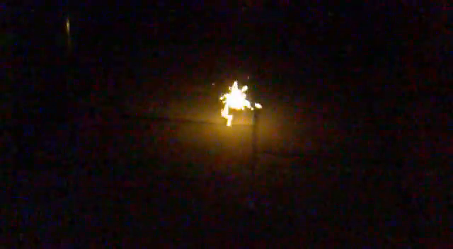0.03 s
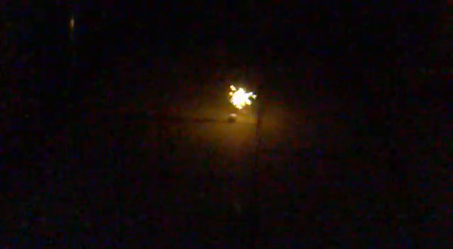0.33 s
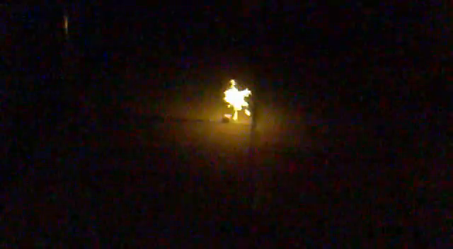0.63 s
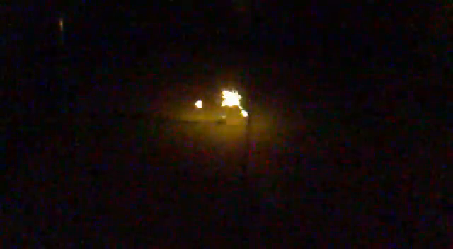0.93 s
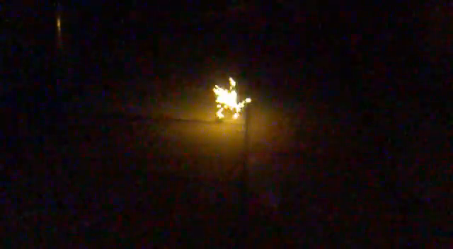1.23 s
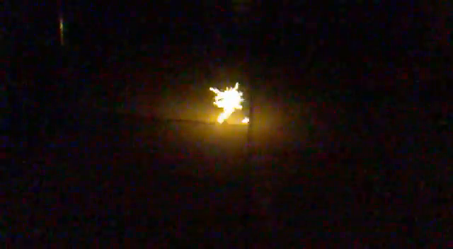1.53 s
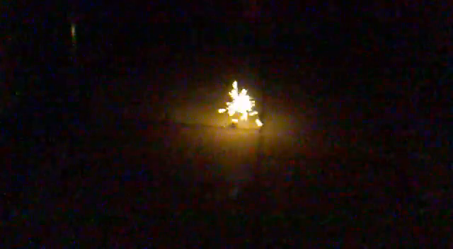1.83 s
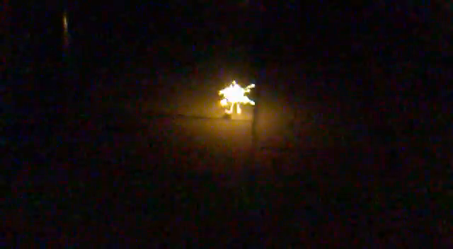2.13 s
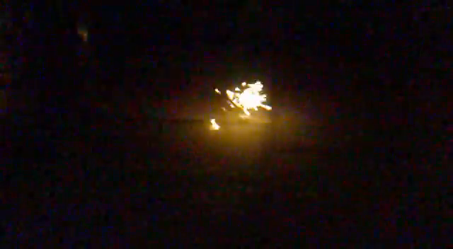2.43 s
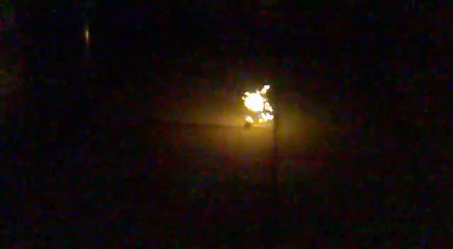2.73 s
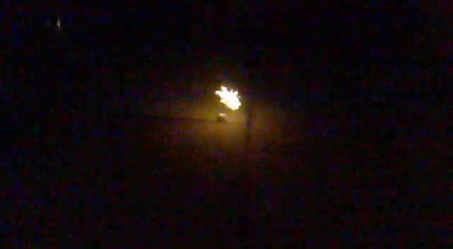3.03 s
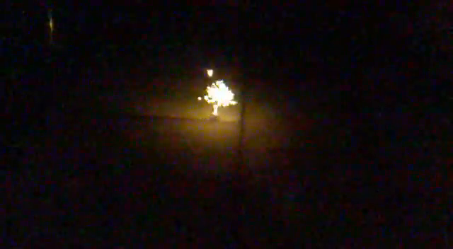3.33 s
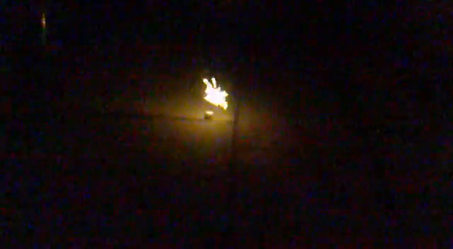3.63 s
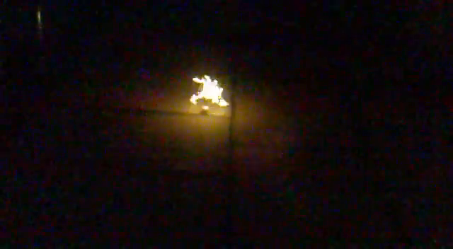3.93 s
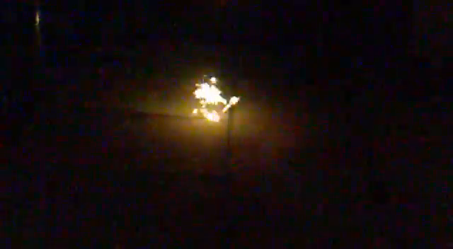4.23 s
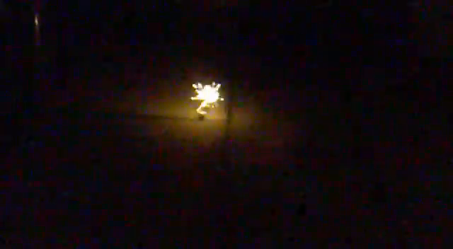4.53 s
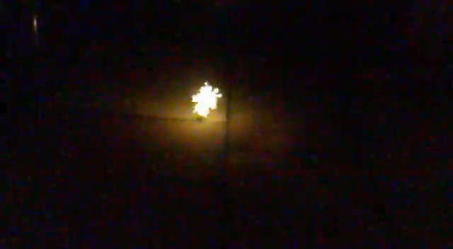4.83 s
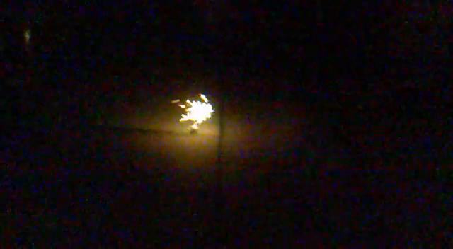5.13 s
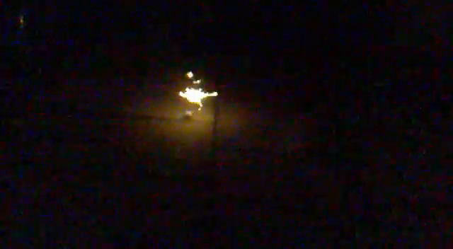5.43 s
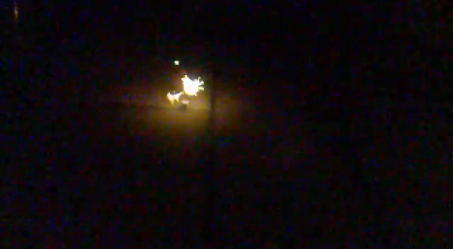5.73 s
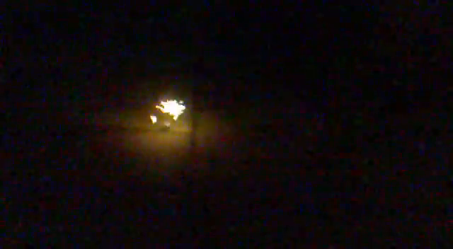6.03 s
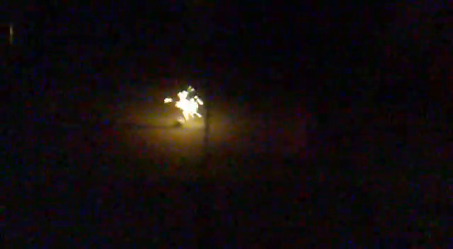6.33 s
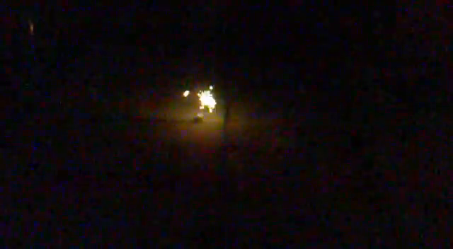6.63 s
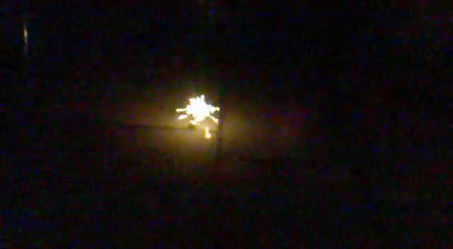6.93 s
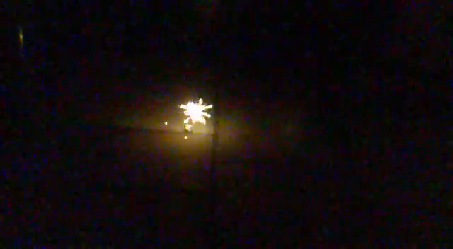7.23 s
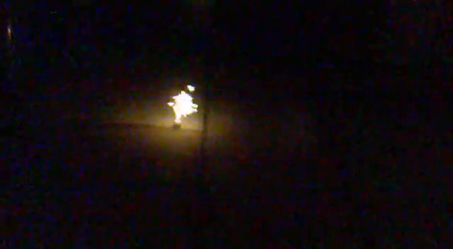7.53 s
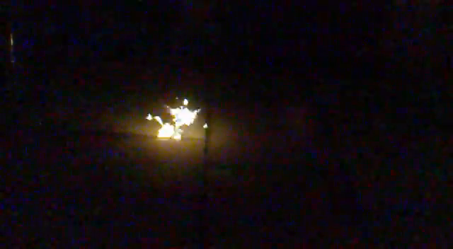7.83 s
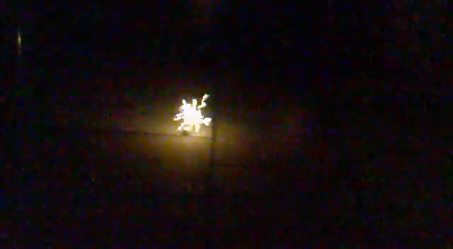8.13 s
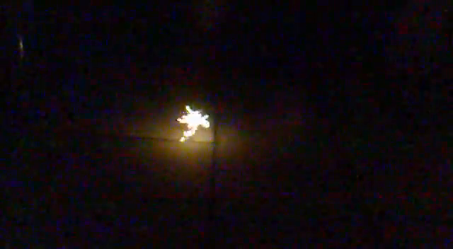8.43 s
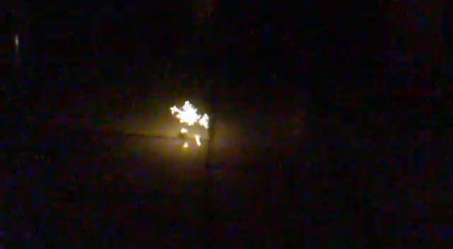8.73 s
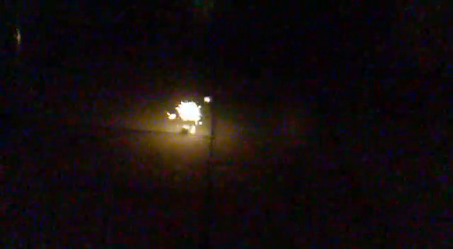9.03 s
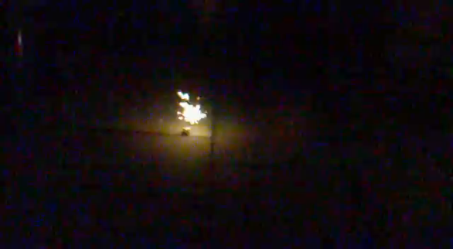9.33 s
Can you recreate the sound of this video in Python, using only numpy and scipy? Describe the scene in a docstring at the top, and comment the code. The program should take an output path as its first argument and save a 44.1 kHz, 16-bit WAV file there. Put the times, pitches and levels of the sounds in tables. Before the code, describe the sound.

A faint night-time town rumble and light microphone hiss continue throughout, outdoors. During the first six seconds a very distant, barely audible engine climbs through its gears. At about 2.6 seconds something small and hard snaps close by in a quick, quiet cluster of gritty clicks, followed by two soft taps at 2.8 seconds. At 5.1 seconds a small firework gives a sharp, dry bang with a lighter knock right behind it, then a duller pop at 5.5 seconds. Each leaves a brief wash of noise and an echo from distant walls. A tiny tap comes at 7.1 seconds. At 7.7 seconds the firework gives a loud, bright crack with the strongest echo, dying away within about a second. Then only the background remains, its low rumble swelling slightly around 9 seconds.

```python
"""First comes the faint night rumble of a town, with microphone hiss and a far engine pulling up
through its gears. Something small snaps close by, its clicks exciting the resonances of a hard body,
and two soft taps follow. Then a few dry firework pops go off, each a millisecond pressure pulse.
After each pop a brief broad wash of noise holds, then drops away, and distant walls reflect the
pulse after the round trip of the sound."""
import sys
import numpy as np
from scipy import signal
from scipy.fft import rfft, irfft, next_fast_len
from scipy.io import wavfile
from scipy.ndimage import uniform_filter1d

SR = 44100
rng = np.random.default_rng(int(sys.argv[2]) if len(sys.argv) > 2 else 0)


def file_out(sig):
    """Save sig as 16-bit WAV at sys.argv[1]."""
    # one column per channel
    cols = np.atleast_2d(sig).T
    # limit, then scale
    lim = np.clip(cols, -1, 1)
    pcm = np.round(lim * 32767).astype(np.int16)
    wavfile.write(sys.argv[1], SR, pcm)


N = 417627
TIME = np.arange(N) / SR
FFT_SIZE = next_fast_len(N + 2 * SR)
FREQ = np.maximum(np.fft.rfftfreq(FFT_SIZE, 1 / SR), 1)


# pressure spectrum of each kind of pulse: (frequency [Hz], relative level [dB])
PULSE_SPECTRA = { "crack": [(40, 0), (150, 0), (700, -3), (1100, -5.5), (1450, -4), (1900, 10.5),
                 (2800, 15), (3450, -3), (4350, 15.5), (5500, 11), (6800, -4.5), (7800, 4), (9600, -4.5),
                 (14500, 1)], "bang": [(35, -8), (130, 2.5), (500, 6.5), (700, -6), (1050, 5), (1220, -4),
                 (1850, 10), (2700, 3), (4400, 3.5), (5200, -10.5), (8000, -10), (11000, -25),
                 (15000, -21)], "thud": [(35, -6), (100, 0), (170, -2.5), (500, 4.5), (730, -7), (950, -2),
                 (1800, -6), (2700, -11.5), (3500, -38), (15000, -54)], "knock": [(40, -14), (450, 1.5),
                 (800, -5), (1700, 4), (2300, -1), (3600, -10), (5000, -31), (15000, -43)],
                 "tap": [(40, -12), (500, 2), (1000, -9), (1720, 10), (2200, -7), (15000, -40)], }
# two soft taps following the snap, then the firework pops:
# (time [s], direct gain [dB], wash gain [dB], wall gain [dB], treble of wash and echo [dB], kind)
PULSE_EVENTS = [ (2.7917, -33, -52, -52, -6, "tap"), (2.8262, -31.5, -52, -54, -6, "tap"),
                (5.1492, 0.1, -21.5, -31, 0.5, "bang"), (5.192, -14, -49, -57, -4, "knock"),
                (5.2014, -21, -60, -60, -6, "thud"), (5.4993, -2, -27.5, -37, -4, "thud"),
                (7.1160, -36, -55, -55, -2, "tap"), (7.7308, 1.6, -19, -20.5, -0.5, "crack"), ]

def taps_and_pops(shelf_from_hz=2792, shelf_to_hz=5500):
    """Impulsive radiation: each tap or pop is one pulse. Returns direct, wash and wall shares."""
    direct, wash, wall = np.zeros((3, N))
    for start, db, wash_db, wall_db, treble_db, kind in PULSE_EVENTS:
        add(direct, start, undb(db) * pulse(PULSE_SPECTRA[kind]))
        shelved_pulse = pulse([(shelf_from_hz, 0), (shelf_to_hz, treble_db)])
        add(wash, start, undb(wash_db) * shelved_pulse)
        add(wall, start, undb(wall_db) * shelved_pulse)
    return direct, wash, wall


# clicks: (time [s], relative level [dB], scrape decay by 60 dB [s], knock re click [dB])
SNAP_CLICKS = [(2.6018, -21.5, 0.012, -25), (2.6629, -3.5, 0.0052, -6), (2.6717, -2, 0.014, -15),
               (2.6731, -3, 0.0045, -6), (2.6857, -4, 0.0034, 5.5), (2.7092, -17.5, 0.0089, -3)]
# ringing modes of the hard object: (frequency [Hz], bandwidth [Hz], relative gain [dB])
RING_MODES = [(1650, 300, -2), (2280, 220, 3), (3050, 340, 5), (4090, 480, 4), (5300, 240, 7.5),
              (7000, 300, 3.5), (7700, 330, 2), (8600, 330, -1), (9400, 220, -1.5)]
# modes of its hollow body: (frequency [Hz], bandwidth [Hz], gain [dB])
BODY_MODES = [(85, 9.3, -15), (330, 150, -33), (1075, 270, -21.5)]

def snap(ring_db=-32, tick_db=-51, trail_db=-19, trail_t60=0.15, wash_db=-51, wall_db=-52):
    """Modal excitation: gritty clicks ring a small hard body. Returns direct, wash and wall shares."""
    grit, knock = np.zeros((2, N))
    t = TIME[:SR]
    for start, db, t60, knock_db in SNAP_CLICKS:
        scrape = fade(t, t60) + undb(trail_db) * fade(t, trail_t60)
        blow = fade(t, t60=0.0061) + undb(-22.5) * fade(t, t60=0.18)
        add(grit, start, undb(db) * scrape * rng.standard_normal(len(t)))
        add(knock, start, undb(db + knock_db) * blow * rng.standard_normal(len(t)))
    bright = filtered(grit, undb(ring_db) * modal_response(RING_MODES) + undb(tick_db))
    hollow = filtered(knock, modal_response(BODY_MODES))
    return bright + hollow, undb(wash_db) * grit, undb(wall_db) * grit


# spectrum of the wash of noise after each sharp sound: (frequency [Hz], gain [dB])
WASH_SPECTRUM = [(40, 9.5), (130, 12.5), (400, 10), (1500, 6.5), (4000, 3.5), (7000, -1.5), (15000, -4)]

def noise_wash(sound, hold_t60=1.8, onset_t60=0.056, onset_db=4, drop_s=0.26):
    """Convolution with noise: a brief broad wash follows each sharp sound, holds, then drops away."""
    hold = 1 / (1 + (TIME / drop_s) ** 6)
    envelope = hold * fade(TIME, hold_t60) + undb(onset_db) * fade(TIME, onset_t60)
    return filtered(sound, noise_tail(envelope) * contour(WASH_SPECTRUM))


# reflecting walls: (distance [m], relative level [dB])
DISTANT_WALLS = [(14, 0), (22.3, 0), (36, -8), (49, -8)]
# spectrum of their echoes: (frequency [Hz], gain [dB])
WALL_SPECTRUM = [(40, 8), (130, 9.5), (500, 7.5), (850, 4.5), (1400, 9.5), (1800, 2), (2400, 3.5),
                 (4000, -7.5), (8000, -9.5), (15000, -16)]

def wall_echoes(sound, rise_s=0.018, slap_t60=0.17, linger_db=-2, linger_t60=1.1, speed_m_per_s=343):
    """Reflection: each wall slaps back after the round trip, then lingers; the energies add."""
    energy = np.zeros(N)
    for metres, db in DISTANT_WALLS:
        t = np.maximum(TIME - 2 * metres / speed_m_per_s, 0)
        rise = np.minimum(t / rise_s, 1)
        decay = fade(t, slap_t60) + undb(linger_db) * fade(t, linger_t60)
        energy += (undb(db) * rise * decay) ** 2
    return filtered(sound, noise_tail(np.sqrt(energy)) * contour(WALL_SPECTRUM))


def noise_tail(envelope, patchy_db=1.3, ring_hz=1370, ring_width_hz=110, ring_db=-9):
    """Random impulse response: the spectrum of an uneven noise tail, ringing a little at one pitch."""
    tail = rng.standard_normal(N) * undb(patchy_db * wander(90)) * envelope
    colour = 1 + undb(ring_db) * resonance(ring_hz, ring_width_hz)
    return rfft(tail / np.linalg.norm(tail), FFT_SIZE) * colour


# one pull per gear: (time [s], duration [s], initial firing rate [Hz], climb [Hz/s], base level [dB])
GEAR_PULLS = [(-0.3, 1.6, 85.5, 1.13, -78.5), (1.504, 0.73, 106, 19, -81), (3.902, 1.88, 96.4, 17.5, -83.5)]

def far_engine(flutter_depth=0.25, drift_depth=0.0039, half_order_db=-11, throttle_s=0.3,
               rev_db_per_hz=0.31):
    """Periodic firing: only the rising note and its half order carry this far, wavering on the way."""
    out = np.zeros(N)
    drift, flutter = wander(14), wander(7.1)
    for start, length, start_hz, climb, db in GEAR_PULLS:
        t = np.clip(TIME - start, 0, length)
        firing_hz = start_hz + climb * t
        phase = 2 * np.pi * np.cumsum(firing_hz * (1 + drift_depth * drift)) / SR
        throttle = np.minimum(np.minimum(t, length - t) / throttle_s, 1)
        gain = throttle * undb(db + rev_db_per_hz * (firing_hz - start_hz))
        out += gain * (np.sin(phase) + undb(half_order_db) * np.sin(phase / 2))
    return np.sqrt(2) * out * (1 + flutter_depth * flutter)


# noise floor of the town: (frequency [Hz], base spectral density [dB re 1/Hz])
TOWN_SPECTRUM = [(12, -110), (30, -104), (53, -92), (88, -98), (135, -103.5), (190, -103.3), (360, -107.5),
                 (560, -107), (900, -108), (1450, -108.3), (1750, -111.5), (2200, -110.7), (5000, -118),
                 (15000, -135)]
# humps on that floor: (frequency [Hz], bandwidth [Hz], base spectral density [dB re 1/Hz])
TOWN_HUMPS = [(540.6, 20, -106), (1317, 70, -103.5), (1500, 47, -108), (2190, 250, -112),
              (3520, 290, -111.5), (5065, 850, -118), (8740, 820, -121)]
# swells of the murmur above the rumble: (peak time [s], half-length [s], rise [dB])
MURMUR_SWELLS = [(0.12, 0.3, 2.2), (1.72, 0.26, 3), (2.75, 0.6, 2.6), (3.95, 0.89, 1.7), (6.3, 0.64, 1),
                 (7.18, 0.2, 3)]
# heaves of the rumble: (peak time [s], half-length [s], rise [dB])
RUMBLE_HEAVES = [(8.98, 0.35, 4), (9.35, 0.3, 2.5)]

def town(murmur_db=-0.23, wander_db=0.44, flicker_db=0.42, split_hz=150,
         rumble_db=2.5, sink_db_per_s=0.07, rumble_flicker_db=1.0):
    """Modulated broadband noise: a murmur swells over a rumble that slowly sinks, then heaves."""
    floor = contour(TOWN_SPECTRUM)
    low_share = 1 / (1 + (FREQ / split_hz) ** 4)
    hump_power = sum(abs(undb(db) * resonance(hz, width)) ** 2 for hz, width, db in TOWN_HUMPS)
    murmur = noise(np.sqrt(floor ** 2 * (1 - low_share) + hump_power))
    rumble = noise(floor * np.sqrt(low_share))
    murmur *= undb(murmur_db + swelling(MURMUR_SWELLS) + wander_db * wander(5) + flicker_db * wander(22))
    trend_db = rumble_db - sink_db_per_s * TIME + swelling(RUMBLE_HEAVES)
    rumble *= undb(trend_db + rumble_flicker_db * wander(5.8))
    return murmur + rumble


def swelling(swells):
    """Slow amplitude modulation: a sum of bell-shaped rises, in dB."""
    return sum(db * np.cos(np.pi / 2 * np.clip((TIME - peak) / half_length, -1, 1)) ** 4
               for peak, half_length, db in swells)


def wander(rate_hz):
    """Low-pass random process with unit standard deviation."""
    hold = int(SR / rate_hz)
    steps = np.repeat(rng.standard_normal(N // hold + 1), hold)
    smooth = uniform_filter1d(uniform_filter1d(steps, hold), hold)[:N]
    return smooth / smooth.std()


def pulse(spectrum, size=2048):
    """Minimum phase: the most abrupt causal pulse with this spectrum."""
    grid = np.maximum(np.fft.rfftfreq(size, 1 / SR), 1)
    cepstrum = irfft(np.log(contour(spectrum, grid)))[:size // 2]
    cepstrum[1:] *= 2  # fold onto positive time
    return irfft(np.exp(rfft(cepstrum, size)))[:size // 2]


def contour(points, grid=FREQ):
    """Spectral envelope: gain through (frequency [Hz], level [dB]) points, in log frequency."""
    hz, db = np.transpose(points)
    return undb(np.interp(np.log(grid), np.log(hz), db))


def resonance(hz, width_hz):
    """Damped oscillator: band-pass response with gain 1 at its centre."""
    return 1 / (1 + 1j * (FREQ ** 2 - hz ** 2) / (FREQ * width_hz))


def modal_response(modes):
    """Modal superposition: resonances add with alternating sign."""
    return sum((-1) ** k * undb(db) * resonance(hz, width) for k, (hz, width, db) in enumerate(modes))


def filtered(sound, response):
    """Convolution: the spectrum is multiplied by a frequency response."""
    return irfft(rfft(sound, FFT_SIZE) * response, FFT_SIZE)[:N]


def noise(density):
    """Spectral shaping: Gaussian noise with this amplitude per root hertz."""
    return filtered(rng.standard_normal(N), density) * np.sqrt(SR / 2)


def fade(t, t60):
    """Exponential decay: 60 dB in t60 seconds."""
    return np.exp(-np.log(1000) * t / t60)


def undb(db):
    """Amplitude ratio of a level in decibels."""
    return 10 ** (np.asarray(db) / 20)


def add(out, start_s, sound):
    """Superposition: mix a sound in from its start time."""
    start = int(start_s * SR)
    out[start:start + len(sound)] += sound[:N - start]


def scene():
    """Linear superposition: pops, taps and snap with their wash and echoes, over engine and town."""
    pulses, pulse_wash, pulse_wall = taps_and_pops()
    clicks, click_wash, click_wall = snap()
    tails = noise_wash(pulse_wash + click_wash) + wall_echoes(pulse_wall + click_wall)
    return (pulses + clicks + tails + far_engine() + town())[None]


def record(dry, hiss_density_db=-114.7, converter_offset=-0.00036, cutoff_hz=16000):
    """Phase dispersion: the microphone port smears pulses; hiss is added and the top is cut."""
    port = 1 - 2 * resonance(hz=4500, width_hz=3500)  # all-pass
    heard = filtered(dry[0], port)[None] + noise(undb(hiss_density_db)) + converter_offset
    return signal.sosfilt(signal.butter(16, cutoff_hz, fs=SR, output="sos"), heard)


dry = scene()
out = record(dry)
file_out(out)
```